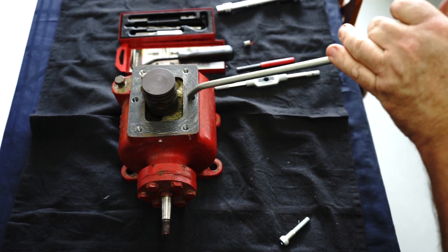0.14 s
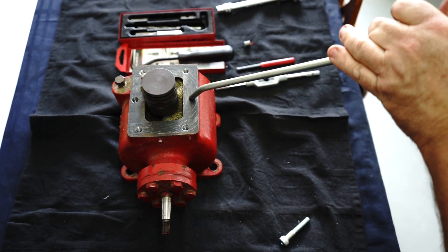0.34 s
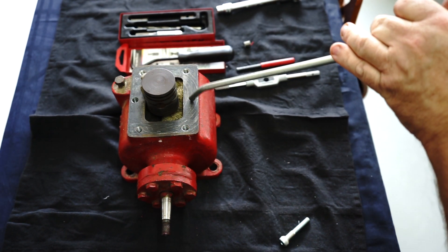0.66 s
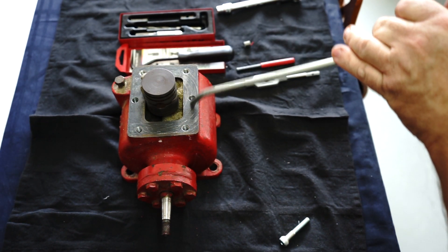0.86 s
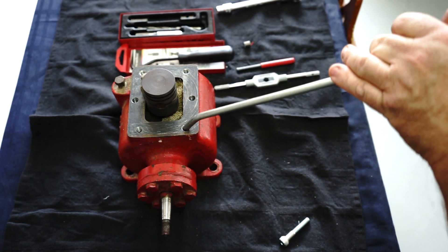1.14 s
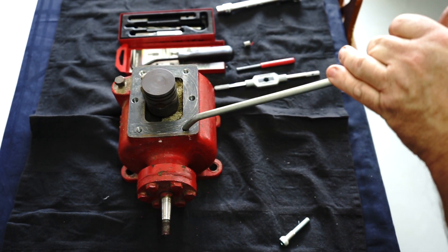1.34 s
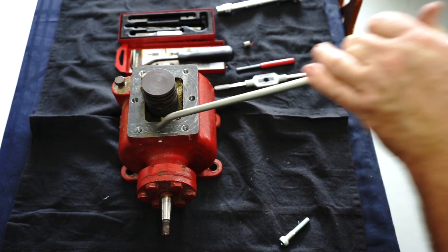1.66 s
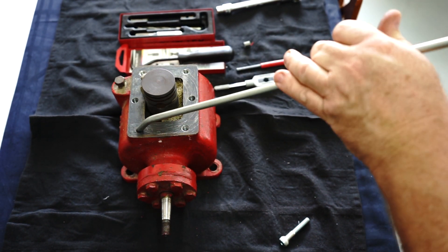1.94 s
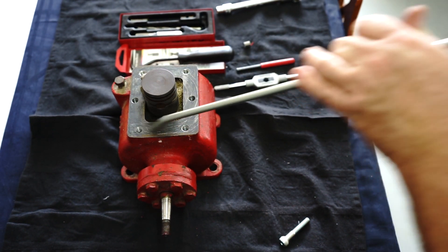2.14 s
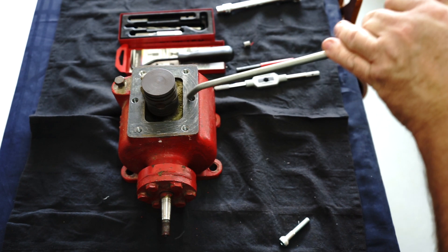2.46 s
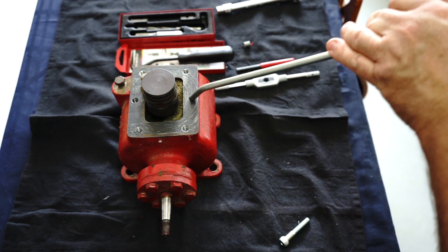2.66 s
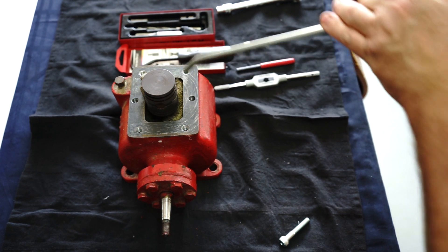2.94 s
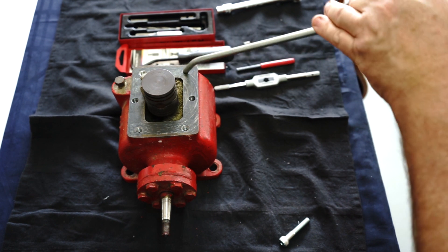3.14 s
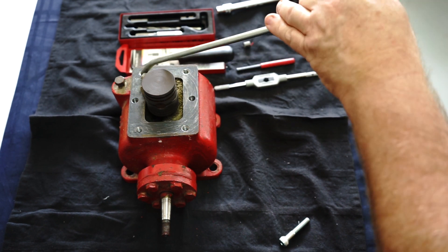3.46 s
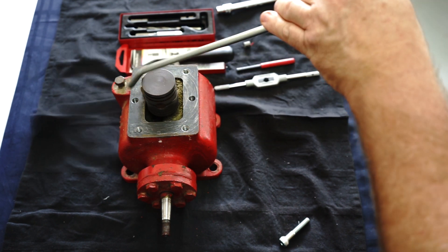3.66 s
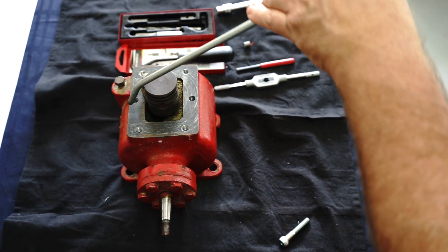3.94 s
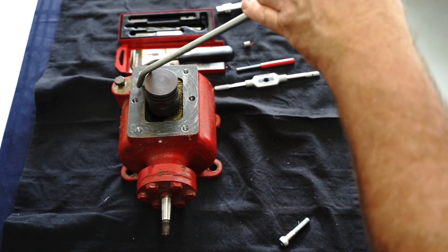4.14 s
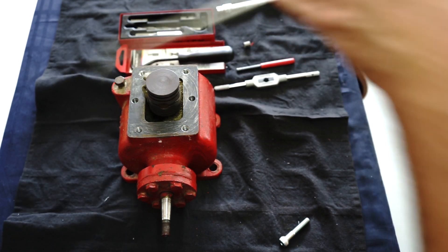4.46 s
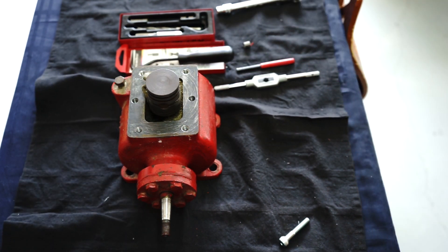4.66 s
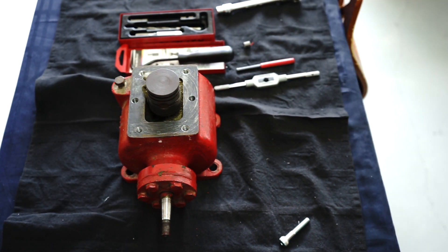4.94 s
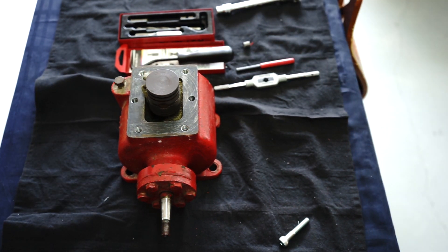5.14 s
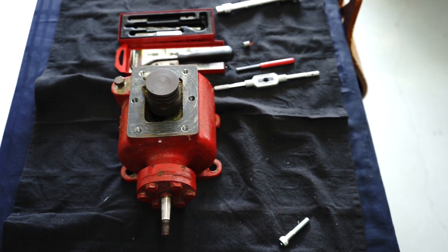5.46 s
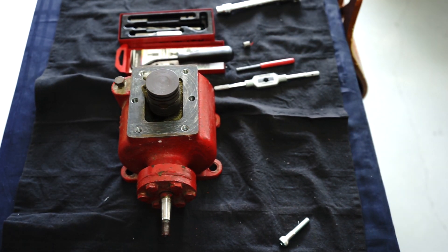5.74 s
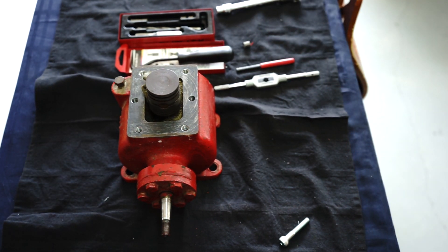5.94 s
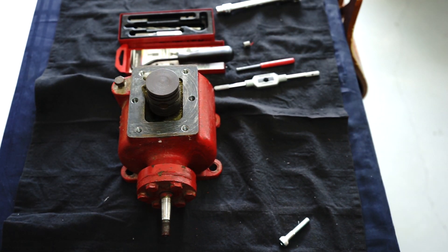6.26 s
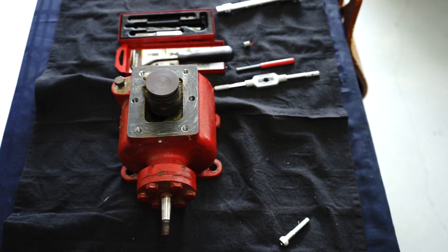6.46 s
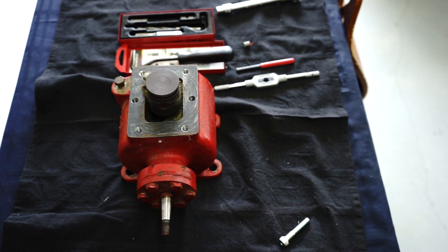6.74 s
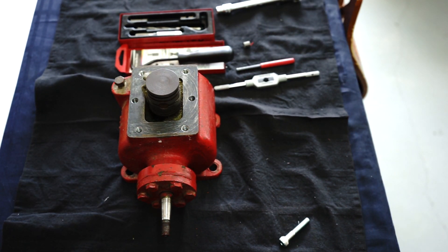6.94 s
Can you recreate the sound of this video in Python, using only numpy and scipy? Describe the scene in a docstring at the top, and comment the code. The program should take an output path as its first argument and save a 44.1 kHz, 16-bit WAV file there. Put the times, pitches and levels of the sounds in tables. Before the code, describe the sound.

Compressed air blasts over a metal casting, hissing and chirping across small holes, then cuts off before a few light knocks.

```python
"""A bright hiss of air, broken by chirps: a blow gun clears the tapped holes of a cast-iron housing
on a cloth-covered bench in a small workshop. The jet splashes on edges, makes each hole resonate and
whistles when it hits one squarely; the loudest chirps duck the limiter. The air stops, a faint leak
sings on, and further off the hose drags and the gun is put down with a few knocks."""
import sys
import numpy as np
from scipy import signal
from scipy.fft import rfft, irfft, next_fast_len
from scipy.io import wavfile
from scipy.ndimage import uniform_filter1d

SR = 44100
rng = np.random.default_rng(int(sys.argv[2]) if len(sys.argv) > 2 else 0)


def transcribe(signal):
    """Save signal, clipped to [-1, 1], as a 16-bit WAV file at the path in sys.argv[1]."""
    frames = np.atleast_2d(signal).T
    limited = np.clip(frames, -1, 1)
    pcm = np.round(limited * 32767).astype(np.int16)
    wavfile.write(sys.argv[1], SR, pcm)


N = 312916
TIME = np.arange(N) / SR
CUTOFF_HZ = 16000


def from_db(db):
    """Decibels to gain."""
    return 10 ** (np.asarray(db) / 20)


def rms_one(x):
    """Scale to unit rms."""
    return x / np.sqrt(np.mean(x ** 2) + 1e-20)


def curve(rows):
    """Automation line through (time_s, value) points."""
    return np.interp(TIME, *np.transpose(rows))


def held(start, end, ramp_s):
    """Gate with linear fades centred on start and end."""
    return np.clip(np.minimum(TIME - start, end - TIME) / ramp_s + .5, 0, 1)


def swells(rows):
    """Bell-shaped gain swells from (peak_s, half_width_s, level_db) rows."""
    return sum(from_db(db) * np.exp(-((TIME - s) / width) ** 2) for s, width, db in rows)


def at_hz(points, hz):
    """Read a table on a log-frequency axis."""
    at, value = np.transpose(points)
    return np.interp(np.log(np.maximum(hz, 1)), np.log(at), value)


def shape(x, gain_at):
    """Zero-phase EQ by a gain curve over frequency."""
    size = next_fast_len(x.shape[-1] + 2048)
    hz = np.arange(size // 2 + 1) * SR / size
    return irfft(rfft(x, size) * gain_at(hz), size)[..., :x.shape[-1]]


def diffuse(size):
    """White stereo noise at two close microphones: narrow in the bass, wide in the treble."""
    # likeness of left and right: freq_hz, correlation
    likeness = [(60, 0.74), (150, 0.99), (400, .92), (1200, 0.93), (2500, 0.54), (5000, 0.11),
                (9000, 0.031), (15000, .1)]
    mid, side = rng.standard_normal((2, size))
    mid = shape(mid, lambda hz: np.sqrt(1 + at_hz(likeness, hz)))
    side = shape(side, lambda hz: np.sqrt(1 - at_hz(likeness, hz)))
    return mid + side * [[1], [-1]]


def noise(colour):
    """Stereo noise coloured by (freq_hz, relative_db) points; its mono mix has unit rms."""
    both = shape(diffuse(N), lambda hz: from_db(at_hz(colour, hz)) * (hz < CUTOFF_HZ))
    return both / both.mean(axis=0).std()


def drift(rate_hz):
    """Random wander, mostly slower than rate_hz, at unit rms."""
    return rms_one(shape(rng.standard_normal(N), lambda hz: 1 / (1 + (hz / rate_hz) ** 2)))


def narrow(centre_hz, width_hz):
    """Noise ringing in one steep-sided resonance whose centre may move, at unit rms."""
    phase = 2 * np.pi * np.cumsum(centre_hz + np.zeros(N)) / SR
    slow = shape(rng.standard_normal((2, N)), lambda hz: 1 / (1 + (hz / width_hz) ** 2) ** 2)
    return rms_one(slow[0] * np.cos(phase) + slow[1] * np.sin(phase))


def aim(crossing_s, lead_s):
    """Passing over a hole shifts the jet's hiss and rush, rings the hole and stirs the hollow housing."""
    # passes over holes: start_s, end_s, hiss_change_db, rush_change_db, ring_db, pitch_hz, hollow_db
    passes = [(0.045, 0.192, -6.5, 4.5, -20.5, 4504, -39), (0.505, 0.537, 0.5, -5, -20.5, 3950, -54),
              (0.655, 0.72, 1, 4, -28.5, 4600, -42), (0.887, 1.118, -9, 3, -20, 4543, -41),
              (1.583, 1.755, -2.5, 2.5, -14.5, 4276, -42), (1.756, 1.97, 1, 0.5, -24, 5015, -49.5),
              (2.15, 2.302, -3.5, 3, -18, 4743, -42.5), (2.309, 2.44, -8.5, -6.5, -37.5, 4865, -46.5),
              (2.442, 2.512, -9, 4.5, -24.5, 4450, -43.5), (2.865, 3.045, -1, 2.5, -19.5, 4350, -46.5),
              (3.215, 3.335, -4.5, -1.5, -15.5, 4300, -48.5), (4.001, 4.426, -5, 1, -24.5, 4588, -46.5)]
    starts, ends, hiss_change_db, rush_change_db, ring_db, hz, hollow_db = np.transpose(passes)
    over = np.array([held(start, end, crossing_s) for start, end in zip(starts, ends)])
    # the jet's fringe stirs the hollow before its core reaches the hole
    stirred = np.array([held(start - lead_s, end, crossing_s) for start, end in zip(starts, ends)])
    swirl = np.sqrt(from_db(hollow_db) ** 2 @ stirred)
    blown = np.zeros(N)
    for start, end, db in zip(starts, ends, ring_db):
        at = (TIME > start) & (TIME < end)
        arch = np.abs(np.sin(np.pi * (TIME[at] - start) / (end - start)))  # strongest mid-pass
        blown[at] += from_db(db) * arch ** 0.69
    pitch_hz = np.interp(TIME, np.column_stack([starts, ends]).ravel(), np.repeat(hz, 2))
    return hiss_change_db @ over, rush_change_db @ over, blown, pitch_hz, swirl


def jet(hiss_change_db, rush_change_db, swirl, flutter_db):
    """Turbulence on flat metal, on edges and in the hollow casting, all fluttering together."""
    # bright hiss on flat metal: freq_hz, relative_db
    hiss_colour = [(1500, -35.5), (3500, -9), (6000, 0), (9000, 0.5), (12000, -0.5), (14500, -0.5),
                   (16000, -6.5)]
    # fader ride of the hiss, sinking as the blast goes on: time_s, level_db
    hiss_ride = [(0, -16.5), (0.25, -16.5), (0.85, -17), (1.29, -17), (1.37, -22), (1.45, -16.5),
                 (1.58, -17.5), (1.78, -24.5), (1.9, -22), (2.07, -25), (2.3, -24.5), (2.55, -19.5),
                 (2.78, -23), (3.14, -21.5), (3.42, -21), (3.58, -22), (3.66, -24), (4.41, -19.5)]
    # sharp splash on an edge: freq_hz, relative_db
    splash_colour = [(2500, -33.5), (4000, -5), (5400, 3), (6600, -2.5), (8000, -10.5), (11000, -16.5),
                     (16000, -34.5)]
    # edges of the casting split the jet: start_s, end_s, splash_db, extra_hiss_db
    edges = [(0.0, 0.05, -18, -29), (0.184, 0.207, -14.5, -21.5), (0.501, 0.89, -27, -28),
             (1.103, 1.14, -21.5, -27.5), (1.642, 1.743, -20, -29), (1.83, 1.99, -25.5, -26.5),
             (2.1, 2.155, -23, -22), (2.514, 2.585, -18.5, -22), (2.65, 2.698, -30.5, -18),
             (2.837, 2.864, -21.5, -17), (3.06, 3.087, -15, -15.5), (3.175, 3.207, -36.5, -19.5),
             (3.26, 3.32, -19, -22), (3.329, 3.448, -17.5, -28), (3.5, 3.598, -33.5, -24.5),
             (3.869, 3.978, -27.5, -32), (4.051, 4.09, -19, -45.5), (4.298, 4.327, -14.5, -29),
             (4.355, 4.405, -24, -36.5)]
    # duller rush of spreading air: freq_hz, relative_db
    rush_colour = [(25, -41.5), (65, -20), (150, -28), (400, -12.5), (700, -10), (1100, -5.5), (1500, 0.5),
                   (2200, 2), (3000, 0), (4200, 1), (8000, -23)]
    # fader ride of the rush: time_s, level_db
    rush_ride = [(0, -32), (0.24, -36.5), (0.35, -32), (0.6, -37.5), (0.9, -39), (1.2, -34), (1.37, -37),
                 (1.56, -33.5), (2.05, -40), (2.25, -37), (2.62, -40), (2.85, -36), (3.14, -39.5),
                 (3.38, -39), (3.52, -40.5), (3.93, -31), (4.02, -39.5), (4.41, -36.5)]
    # low body of the housing: freq_hz, relative_db
    hollow_colour = [(40, -27.5), (150, -27), (210, -8.5), (265, -5), (330, -0.5), (410, -4), (550, -14.5),
                     (900, -9.5), (2000, -33.5)]
    hiss_trim_db, splash_trim_db, hollow_trim_db = 0.5, -1.0, -1.5
    edge_to_rush_db, hollow_idle_db = -21.5, -56
    on_edge = np.array([held(start, end, ramp_s=0.02) for start, end, _, _ in edges])
    edge, edge_hiss = from_db(np.transpose(edges)[2:]) @ on_edge
    flat_hiss = from_db(curve(hiss_ride) + hiss_change_db + hiss_trim_db)
    flat_rush = from_db(curve(rush_ride) + rush_change_db)
    hiss = np.hypot(flat_hiss, edge_hiss) * noise(hiss_colour)
    splash = edge * from_db(splash_trim_db) * noise(splash_colour)
    rush = np.hypot(flat_rush, edge * from_db(edge_to_rush_db)) * noise(rush_colour)
    hollow = np.hypot(swirl, from_db(hollow_idle_db)) * from_db(hollow_trim_db) * noise(hollow_colour)
    return (hiss + splash + rush + hollow) * from_db(flutter_db * drift(rate_hz=36))


def hole(blown, pitch_hz, breath_db, waver_hz, duck_db):
    """A hole's breathy quarter-wave resonance chirps when hit squarely; one chirp leaves a faint ring."""
    # chirps, plus a faint 5 kHz ring lingering in the room after the 1.76 s chirp:
    # start_s, end_s, from_hz, to_hz, level_db
    tones = [(.082, .088, 4400, 4450, -8), (.093, .102, 4550, 4650, -8), (.885, .922, 4900, 4480, -8),
             (.920, .942, 4450, 4050, -17), (1.074, 1.086, 4050, 4150, -14.5),
             (1.084, 1.101, 4180, 4480, -5), (1.735, 1.765, 4230, 4680, -8), (1.762, 1.798, 4600, 5130, -2),
             (1.798, 1.86, 5100, 5050, -14), (2.146, 2.176, 5150, 4680, -1.5),
             (2.176, 2.196, 4680, 4200, -15), (2.975, 2.998, 4080, 4280, -15),
             (3.298, 3.332, 4200, 4500, -8), (3.599, 3.612, 4400, 4250, -14),
             (4.086, 4.102, 4480, 4500, -16)]
    skirt_db, octave_db, idle_db = -2.5, -26, -43
    halo_db, halo_s = -8.5, 0.032  # the breath swells around the end of each tone
    breath = narrow(pitch_hz, width_hz=560)
    breath += from_db(skirt_db) * narrow(pitch_hz, width_hz=1500)  # rough air around the mouth
    waver = waver_hz * drift(rate_hz=260)
    tone, sounding, halo = np.zeros((3, N))
    for start, end, from_hz, to_hz, db in tones:
        gate = held(start, end, ramp_s=0.002)
        at = gate > 0
        glide_hz = np.interp(TIME[at], [start, end], [from_hz, to_hz])
        phase = 2 * np.pi * np.cumsum(glide_hz + waver[at]) / SR
        wave = np.sin(phase) + from_db(octave_db) * np.sin(2 * phase)
        tone[at] += np.sqrt(2) * from_db(db) * gate[at] * wave
        sounding = np.maximum(sounding, gate)
        halo = np.maximum(halo, from_db(db + halo_db) * np.exp(-np.abs(TIME - end) / halo_s))
    strength = np.sqrt(blown ** 2 + halo ** 2 + from_db(idle_db) ** 2)
    return tone + breath * strength * from_db(breath_db + duck_db * sounding)


def puffs():
    """Stray air buffets the microphones with low rumbles."""
    # wind rumble: freq_hz, relative_db
    colour = [(20, -20.5), (40, -10), (65, 3), (100, -1.5), (170, -7), (350, -8.5), (1000, -42)]
    # gusts: peak_s, half_width_s, level_db
    gusts = [(0.458, 0.51, -65), (.76, .03, -54.5), (0.895, 0.058, -54), (1.106, 0.017, -52),
             (1.792, 0.043, -37.5), (2.18, 0.032, -42), (3.33, 0.018, -43.5)]
    return noise(colour) * swells(gusts)


def cloth(start_s, end_s, level_db):
    """A dull roar as the jet slips off the casting into the bench cloth."""
    # air in cloth: freq_hz, relative_db
    colour = [(100, -22), (350, 0), (550, 4), (900, 5), (1400, 0.5), (3000, -8)]
    return from_db(level_db) * held(start_s, end_s, ramp_s=0.02) * noise(colour)


def leak(level_db, pitch_hz, width_hz):
    """A leaking air fitting sings thinly throughout, unmasked when the jet stops."""
    band = shape(diffuse(N), lambda hz: 1 / (1 + ((hz - pitch_hz) / width_hz) ** 2))
    return from_db(level_db) * rms_one(band)


def room_tone(level_db):
    """The workshop's quiet, steady noise bed."""
    # bass-heavy noise floor: freq_hz, relative_db
    colour = [(25, -10.5), (60, -4.5), (110, -3.5), (200, -12), (350, -10.5), (600, -14.5), (1500, -19.5),
              (1900, -19), (3000, -24), (6000, -24.5), (9000, -27), (16000, -33)]
    return from_db(level_db) * noise(colour)


def hose(squeak_s, squeak_hz, squeak_db):
    """The rubber hose squeaks faintly as it starts to slide and rustles as the gun is carried away."""
    # sliding friction: freq_hz, relative_db
    colour = [(40, -17.5), (120, -3.5), (270, 7.5), (600, 4.5), (1200, -3), (1850, -5.5), (2800, -7.5),
              (6000, -8), (14000, -26.5)]
    # drags of the hose: peak_s, half_width_s, level_db
    drags = [(4.79, .07, -63.5), (4.93, 0.053, -63.5), (5.15, 0.079, -66), (5.5, .2, -73),
             (5.99, 0.034, -70.5), (6.33, 0.24, -64), (6.96, 0.26, -46.5)]
    rustle = swells(drags) * noise(colour)
    squeak = swells([(squeak_s, 0.094, squeak_db)]) * narrow(squeak_hz, width_hz=110)
    return rustle + squeak


def struck(modes, t):
    """One blow on a set of modes, each with a random strength and sign; starting power is normalised."""
    hz, db, t60 = np.transpose(modes)[:, :, None]
    strength = from_db(db + 2 * rng.standard_normal(hz.shape)) * rng.choice([-1, 1], hz.shape)
    partials = strength * np.sin(2 * np.pi * hz * t) * from_db(-60 * t / t60)
    return partials.sum(axis=0) / np.sqrt(np.sum(strength ** 2) / 2)


def knocks(crack_t60_s, knock_trim_db, crack_trim_db, ring_trim_db):
    """Each contact thumps and knocks the support, cracks (brighter when hard) and rings the gun."""
    # gun and hose are put down: start_s, thump_db, knock_db, crack_db, crack_top_hz, ring_db
    contacts = [(4.89, -68, -74.5, -85, 1000, -95), (5.04, -69.5, -59, -74.5, 1008, -95),
                (6.123, -93.5, -94, -61, 9000, -93.5), (6.151, -72, -50, -66, 1186, -95),
                (6.369, -67, -40, -37, 1800, -90), (6.406, -73, -37, -39.5, 1590, -89.5),
                (6.658, -44.5, -51, -35, 7280, -32), (6.734, -47.5, -50, -42, 2000, -70),
                (6.809, -41, -33, -29.5, 3800, -56), (6.900, -40.5, -32, -31, 2620, -59),
                (7.055, -44.5, -56, -50, 6050, -66)]
    # low thump of the support: pitch_hz, relative_db, t60_s
    thump_modes = [(61.84, -6.5, 0.29), (89.2, -9, 0.6), (126, -2, 0.36), (145.6, 3.5, 0.27),
                   (198, 7, 0.24), (243, -10.5, 0.21)]
    # short midrange knock of the support: pitch_hz, relative_db, t60_s
    knock_modes = [(305, -4, 0.069), (427, 0, 0.047), (594, 2.5, 0.041), (689, 4, 0.016), (830, 2.5, 0.014),
                   (990, -4.5, 0.031), (1170, -10.5, 0.031), (1595, -3, 0.028), (1940, -21, 0.02)]
    # metal ring of the gun: pitch_hz, relative_db, t60_s
    gun_modes = [(1260, 3, 0.058), (2970, 5, 0.042), (2810, 6, 0.093), (4400, -22, 0.088), (5130, 0, 0.16),
                 (6300, -9.5, 0.17), (6460, -13, 0.073), (7197, -2, .1), (8000, 8, 0.091),
                 (10300, 4, 0.088), (11300, 3, 0.067)]
    out, t = np.zeros(N + SR), np.arange(SR // 2) / SR
    top_cut = signal.butter(4, 12000, fs=SR, output="sos")
    for start_s, thump_db, knock_db, crack_db, top_hz, ring_db in contacts:
        hardness = signal.butter(1, [600, top_hz], "band", fs=SR, output="sos")
        burst = rng.standard_normal(len(t)) * from_db(-60 * t / crack_t60_s)
        crack = signal.sosfilt(top_cut, signal.sosfilt(hardness, burst))
        blow = from_db(crack_db + crack_trim_db) * crack
        blow += from_db(thump_db) * struck(thump_modes, t)
        blow += from_db(knock_db + knock_trim_db) * struck(knock_modes, t)
        blow += from_db(ring_db + ring_trim_db) * struck(gun_modes, t)
        onset = int(start_s * SR)
        out[onset:onset + len(t)] += blow
    return out[:N]


def scatter(x, t60_s, low_cut_hz):
    """Early reflections off nearby objects, too small to turn back long waves."""
    t = np.arange(SR // 10) / SR
    echoes = rms_one(diffuse(len(t)) * from_db(-60 * t / t60_s)) / np.sqrt(len(t))
    echoes = signal.sosfilt(signal.butter(1, low_cut_hz, "high", fs=SR, output="sos"), echoes)
    return signal.fftconvolve(np.atleast_2d(x), echoes, axes=1)[:, :N]


def reverberation(x):
    """The workshop's tail, dying band by band, with unit energy."""
    # room decay: freq_hz, t60_s
    decay = [(100, .5), (530, .4), (1400, .48), (4500, .46), (9700, .31), (16000, .22)]
    t = np.arange(int(.7 * SR)) / SR
    white, tail = diffuse(len(t)), 0
    centres = np.geomspace(100, 16000, 8)
    for centre_hz, weights in zip(centres, np.eye(len(centres))):
        band = shape(white, lambda hz: at_hz(np.column_stack([centres, weights]), hz))
        tail = tail + band * from_db(-60 * t / at_hz(decay, centre_hz))
    fade_in = np.minimum(t / 0.011, 1)
    tail = rms_one(tail * fade_in) / np.sqrt(len(t))
    return signal.fftconvolve(np.atleast_2d(x), tail, axes=1)[:, :N]


def room(x, early_db, tail_db, early_t60_s, early_cut_hz):
    """Direct sound, early reflections and tail, turned down to offset the added power."""
    early, tail = from_db(early_db), from_db(tail_db)
    mix = x + early * scatter(x, early_t60_s, early_cut_hz) + tail * reverberation(x)
    return mix / np.sqrt(1 + (early ** 2 + tail ** 2) / 2)


def limiter(x, ceiling_db, release_db_per_s):
    """Short-term power over the ceiling ducks the gain at once; it recovers steadily."""
    power = uniform_filter1d(x ** 2, size=64).max(axis=0)
    over_db = np.maximum(10 * np.log10(np.abs(power) + 1e-12) - ceiling_db, 0)
    release_db = release_db_per_s * TIME
    reduction_db = np.maximum.accumulate(over_db + release_db) - release_db
    return x * from_db(uniform_filter1d(-reduction_db, size=65))


def scene():
    """The air up close, the knocks further off, all in one room."""
    hiss_change_db, rush_change_db, blown, pitch_hz, swirl = aim(crossing_s=0.025, lead_s=0.0254)
    air = jet(hiss_change_db, rush_change_db, swirl, flutter_db=1.0)
    air += cloth(start_s=3.68, end_s=3.98, level_db=-41)
    air += hole(blown, pitch_hz, breath_db=-4.5, waver_hz=25.06, duck_db=-7.5)
    valve = curve([(4.40, 1), (4.44, 0)])  # the trigger is let go
    handling = knocks(crack_t60_s=0.035, knock_trim_db=6.0, crack_trim_db=9.5, ring_trim_db=-2.5)
    dragging = hose(squeak_s=4.81, squeak_hz=1770, squeak_db=-70)
    close = room(valve * air, early_db=-4.5, tail_db=-8.0, early_t60_s=0.052, early_cut_hz=1510)
    far = room(handling, early_db=0.0, tail_db=5.5, early_t60_s=0.036, early_cut_hz=712)
    action = close + far + dragging + puffs()
    return action + room_tone(level_db=-68.5) + leak(level_db=-76, pitch_hz=4300, width_hz=150)


def record(dry):
    """Slightly unequal microphones with a low cut, a limiter and a steep top cut."""
    # microphone imbalance: freq_hz, left_minus_right_db
    balance = [(60, -1.5), (400, -1.1), (2000, -1.5), (4500, -1.2), (8000, -2), (14000, 3)]
    low_cut_hz, sides = 28, np.array([[.5], [-.5]])
    heard = shape(dry, lambda hz: from_db(at_hz(balance, hz) * sides) * hz / np.hypot(hz, low_cut_hz))
    limited = limiter(heard, ceiling_db=-8.0, release_db_per_s=192.0)
    return shape(limited, lambda hz: np.clip((CUTOFF_HZ + 50 - hz) / 150, 0, 1))


dry = scene()
out = record(dry)
transcribe(out)
```